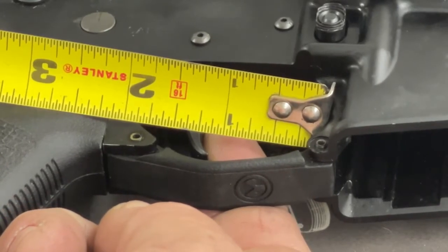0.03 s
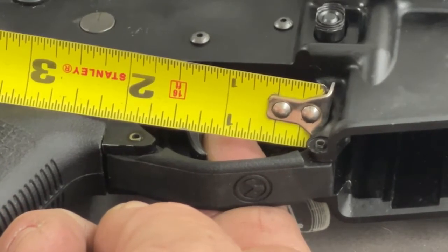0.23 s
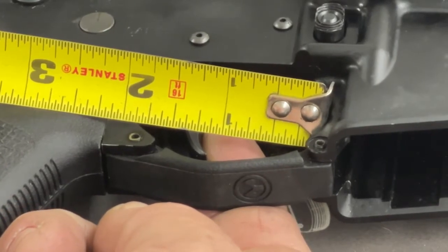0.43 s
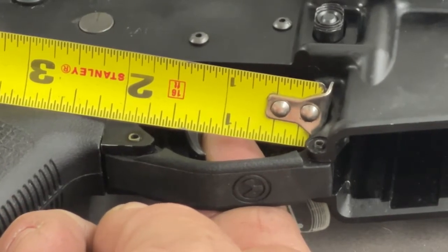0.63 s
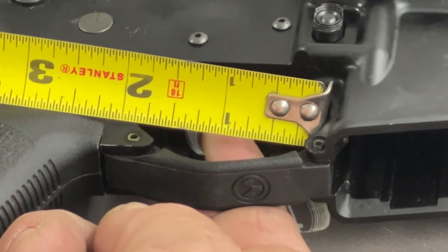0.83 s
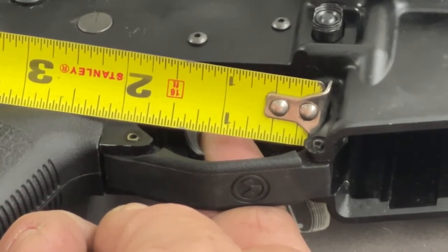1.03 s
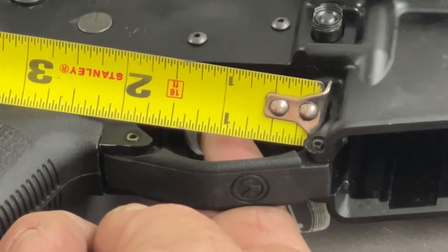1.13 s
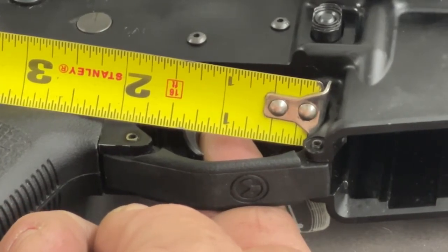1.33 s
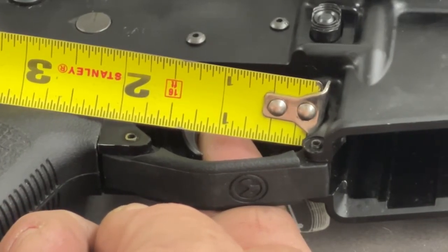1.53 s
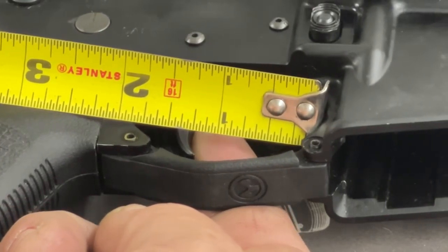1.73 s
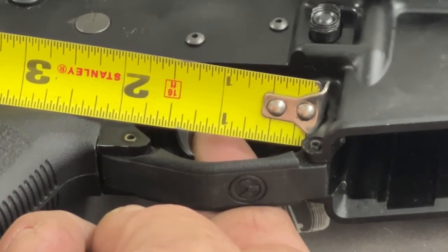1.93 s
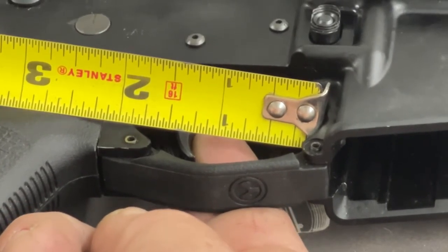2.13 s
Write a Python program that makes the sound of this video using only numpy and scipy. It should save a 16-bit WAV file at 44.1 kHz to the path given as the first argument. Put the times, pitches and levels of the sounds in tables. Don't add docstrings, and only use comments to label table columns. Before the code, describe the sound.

A rifle trigger is dry-fired close to the microphone in a small quiet room with faint hum and air hiss. Barely audible ticks at 0.3 seconds and a tiny scrape lead to one crisp metallic click at 0.4. Quiet follows until 1.7, when the hammer slams with a loud, overloaded snap, bouncing and rattling within hundredths of a second, then a short room tail and a faint settling knock near 1.96.

```python
import sys
import numpy as np
from scipy import signal
from scipy.fft import rfft, irfft
from scipy.io import wavfile
from scipy.ndimage import uniform_filter1d

SR = 44100
rng = np.random.default_rng(int(sys.argv[2]) if len(sys.argv) > 2 else 0)


def voltage_ratio(decibels):
    exponent = np.asarray(decibels, float) / 20
    return 10 ** exponent


def to_wav(s):
    ch = np.atleast_2d(s).T
    pcm = np.round(np.clip(ch, -1, 1) * 32767)
    wavfile.write(sys.argv[1], SR, pcm.astype(np.int16))


N = 96975

# f/Hz, rms level/dB
HUM_TONES = [(59.2, -59), (99.3, -77.5), (119, -81), (139, -81), (199, -78.5), (238, -81.5), (296, -82),
             (395, -76.5), (495, -84), (694, -82), (888, -79.5)]
# f/Hz, level/dB per Hz
AIR_TONE = [(75, -13.5), (170, -24), (400, -18), (900, -19), (2300, -23.5), (4000, -30.5), (7500, -39.5),
            (15700, -46)]
# f/Hz, level/dB
RUMBLE_TONE = [(1, 0), (3, 0), (6, -6), (11, -18), (30, -22), (50, -30), (75, -31), (76, -90)]
# f/Hz, t60/s, level/dB
ROOM_BANDS = [(294, 0.25, -22.5), (699, 0.44, -13.5), (1385, 0.38, -18.5), (2713, 0.42, -23.5),
              (5230, 0.38, -23), (6990, 0.33, -18.5), (10040, 0.29, -20), (14000, .18, -17)]

# t/s, level/dB, contact/s
TICK_HITS = [
    (.3200, -64, .001),
    (.3238, -63, .001),
]
# f/Hz, level/dB, t60/s
TICK_MODES = [(3930, -16, .008), (6800, 4, 0.0071), (9100, -10, .008), (12500, -2, .008)]
# f/Hz, level/dB
TICK_RATTLE_TONE = [(2000, -20), (5000, -6), (7000, 0), (9000, -2), (13000, -2), (15700, -10)]

# t/s, level/dB, length/s
SCRAPE_EVENT = [
    (.4040, -57, .0095),
]
# f/Hz, level/dB
SCRAPE_TONE = [(200, -20), (1500, -8), (3500, 0), (6000, 0), (9500, -4), (11500, -20), (15000, -30)]

# t/s, level/dB, contact/s
CLICK_HITS = [
    (.4135, -9.5, 0.000035),
    (.4143, -27, 0.0000476),
    (.4147, -16.5, .00005),
]
# f/Hz, level/dB, t60/s
TRIGGER_MODES = [(284, -31, .12), (446, -20.5, 0.09), (784, -30, 0.058), (1137, -26, 0.093),
                 (1843, -36, 0.072), (1923, -12, 0.061), (2107, -14, 0.074), (3020, -12.5, 0.0207),
                 (4350, -13, 0.019), (5600, 0.5, 0.0051), (6925, -1.5, 0.0074), (8400, -7, 0.0061),
                 (9950, -14.5, .006), (12150, -12.5, 0.0076)]
# f/Hz, level/dB per Hz
CLICK_RATTLE_TONE = [(100, 8), (1000, -7), (2000, 6), (3500, 0), (6500, 2.5), (9000, -11), (12500, -18),
                     (15700, -25)]

# t/s, level/dB, contact/s
SEAR_HITS = [
    (1.7097, -1.5, .0004),
    (1.7110, -5.5, .0004),
    (1.7125, -18.5, 0.00071),
]
# f/Hz, level/dB, t60/s
SEAR_MODES = [(1461.5, -2, 0.017), (2280, -0.5, 0.0036), (3630, -4, .012), (5694, -7.5, .006),
              (8060, -11.5, .005)]
# f/Hz, level/dB per Hz
SEAR_RATTLE_TONE = [(300, -40), (900, -6.5), (2500, -3), (5000, -4), (9000, -20.5), (11000, -37),
                    (15700, -46.5)]

# t/s, level/dB, contact/s
HAMMER_HITS = [
    (1.7155, 4, 0.0018),
    (1.7177, 9, 0.00099),
    (1.7200, -4, 0.0013),
    (1.7225, -4.5, 0.0012),
    (1.7245, 0.5, 0.00099),
    (1.7262, -11.5, 0.0009),
    (1.7305, -11.5, 0.0011),
    (1.7395, -10.5, .001),
]
# f/Hz, level/dB, t60/s
FRAME_MODES = [(97, -25, .06), (277.2, -24, 0.045), (796, -24.5, 0.047), (1398, -21.5, 0.036),
               (1740, -12, 0.035), (2283, -2, 0.017), (3120, -10, 0.0053), (3259, -5, 0.024),
               (3586, -6, 0.038), (4246, -2, .015), (5260, -9, 0.045), (5609, 0.5, 0.013),
               (6420, -8, 0.0087), (9570, -10, .012)]
# f/Hz, level/dB per Hz
HAMMER_RATTLE_TONE = [(100, -42.5), (650, -37.5), (900, -14.5), (2300, -5), (3500, 0.5), (6300, 1),
                      (8000, -9), (15700, -19.5)]

# t/s, level/dB, length/s
OVERLOAD_SHIFT = [
    (1.717, -24, .0095),
]


def level(x, db):
    return x * voltage_ratio(db) / np.sqrt(np.mean(x ** 2))


def colour(x, tone):
    f = np.fft.rfftfreq(len(x), 1 / SR) + 1
    hz, db = np.array(tone).T
    gain = voltage_ratio(np.interp(np.log(f), np.log(hz), db, left=-90))
    return irfft(rfft(x) * gain, len(x))


def fade(t, t60):
    return (t >= 0) * np.exp(-np.log(1000) * np.maximum(t, 0) / t60)


def walk(rate_hz):
    k = int(SR / rate_hz)
    steps = np.repeat(rng.standard_normal(N // k + 1), k)
    return 1.3 * uniform_filter1d(uniform_filter1d(steps, k), k)[:N]


def hum_and_fan():
    t = np.arange(N) / SR
    out = np.zeros(N)
    for k, (hz, db) in enumerate(HUM_TONES):
        wobble_db, wobble_rad = (-2, 1.15) if k else (-0.33, 0.15)
        loudness = np.sqrt(2) * voltage_ratio(db + wobble_db * walk(18))
        out += loudness * np.sin(2 * np.pi * hz * t + wobble_rad * walk(3.4) + 1.0)
    return out


def air_and_rumble():
    air = level(colour(rng.standard_normal(N), AIR_TONE), -66.5) * voltage_ratio(.5 * walk(6.07))
    rumble = level(colour(rng.standard_normal(N), RUMBLE_TONE), -56)
    return air + rumble


def room(x):
    delay_s, rise_s = 0.0019, 0.004
    t = np.arange(SR // 2) / SR - delay_s
    noise = rfft(rng.standard_normal(len(t)))
    f = np.log(np.fft.rfftfreq(len(t), 1 / SR) + 1)
    centres = np.log(np.array(ROOM_BANDS)[:, 0])
    tail = np.zeros(len(t))
    for (_, t60, db), share in zip(ROOM_BANDS, np.eye(len(ROOM_BANDS))):
        band = irfft(noise * np.interp(f, centres, share), len(t))
        tail += band * voltage_ratio(db - 19) * fade(t, t60)
    return signal.fftconvolve(x, tail * np.clip(t / rise_s, 0, 1))[:N]


def settle_knock():
    t = np.arange(N) / SR - 1.9628
    return voltage_ratio(-42.5) * fade(t, .007) * np.sin(2 * np.pi * 1160 * t)


def scrape_and_thump():
    start_s, db, length_s = SCRAPE_EVENT[0]
    t = np.arange(N) / SR - start_s
    grow = np.clip(t / length_s, 0, 1) ** .5
    gate = grow * fade(np.maximum(t - length_s, 0), .035)
    hiss = level(colour(rng.standard_normal(N), SCRAPE_TONE), db)
    scrape = (gate > .3) * (t < length_s) * hiss
    thump = -voltage_ratio(-41) * gate * np.sin(2 * np.pi * 150 * t)
    return scrape + thump


def strike(hits, modes, spread_db, smooth=0):
    out, t = np.zeros(N), np.arange(SR // 4) / SR
    for s, db, contact in hits:
        weights = rng.standard_normal(len(modes))
        grit = rng.standard_normal(256)
        ring = np.zeros(len(t))
        for (hz, mode_db, t60), weight in zip(modes, weights):
            rise = np.minimum(t * hz, 1)
            tone = np.sin(2 * np.pi * hz * t) * fade(t, t60) * rise
            ring += voltage_ratio(mode_db + spread_db * weight) * tone
        push = (smooth + grit) * fade(t[:256], 3 * contact)
        push = push / np.sqrt(np.sum(push ** 2))
        i = int(s * SR)
        out[i:i + len(t)] += voltage_ratio(db) * np.convolve(ring, push)[:len(t)] / 2
    return out


def rattle(hits, tone, db, t60):
    t = np.arange(N) / SR
    rise_s = .0003
    bursts = np.zeros(N)
    for s, hit_db, _ in hits:
        bursts += voltage_ratio(hit_db) * fade(t - s, t60) * np.clip((t - s) / rise_s, 0, 1)
    return bursts * level(colour(rng.standard_normal(N), tone), db)


def finger_ticks():
    return strike(TICK_HITS, TICK_MODES, 2.5) + rattle(TICK_HITS, TICK_RATTLE_TONE, 0, .01)


def click_ring():
    return strike(CLICK_HITS, TRIGGER_MODES, 1.0, smooth=8)


def click_rattle():
    return rattle(CLICK_HITS, CLICK_RATTLE_TONE, -22, .035)


def snap_ring():
    return strike(SEAR_HITS, SEAR_MODES, 7.5) + strike(HAMMER_HITS, FRAME_MODES, 0.83)


def snap_rattle():
    sear = rattle(SEAR_HITS, SEAR_RATTLE_TONE, -5.5, .01)
    hammer = rattle(HAMMER_HITS, HAMMER_RATTLE_TONE, -3.5, .017)
    return sear + hammer


def scene():
    walls, ring_send_db, click_send_db = 6, -5.5, -6.5
    snap, click, ticks = snap_ring(), click_ring(), finger_ticks()
    tail = np.zeros(N)
    for _ in range(walls):
        tail += room(snap_rattle() + voltage_ratio(click_send_db) * click_rattle()) / np.sqrt(walls)
    tail += voltage_ratio(ring_send_db) * room(snap + voltage_ratio(click_send_db) * click)
    direct = snap + snap_rattle() + click + click_rattle()
    small = ticks + scrape_and_thump() + settle_knock()
    quiet = hum_and_fan() + air_and_rumble()
    return (direct + tail + small + quiet)[None]


def overload_drift():
    start_s, db, length_s = OVERLOAD_SHIFT[0]
    t = np.maximum(np.arange(N) / SR - start_s, 0) / length_s
    push = -voltage_ratio(db) * np.e * t * np.exp(-t)
    recover_hz, damping = 2.3, .75
    w = 2 * np.pi * recover_hz / SR
    swing = [1 + 2 * damping * w + w * w, -2 - 2 * damping * w, 1]
    return signal.lfilter([1, -2, 1], swing, push)


def band_limit(x):
    return signal.sosfilt(signal.butter(12, 15880, fs=SR, output="sos"), x)


def record(dry):
    headroom, top_hz = .9, 15900
    squashed = np.tanh((np.abs(dry) / headroom) ** 3) ** (1 / 3)
    clipped = headroom * squashed * np.sign(dry)
    top_cut = signal.ellip(6, .2, 24, top_hz, fs=SR, output="sos")
    mix = signal.sosfilt(top_cut, clipped) + overload_drift()
    return band_limit(mix)


dry = scene()
out = record(dry)
to_wav(out)
```